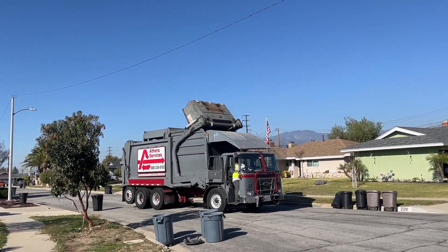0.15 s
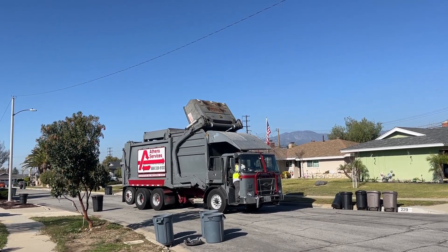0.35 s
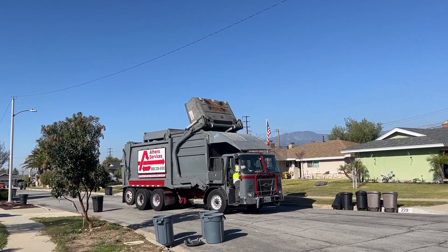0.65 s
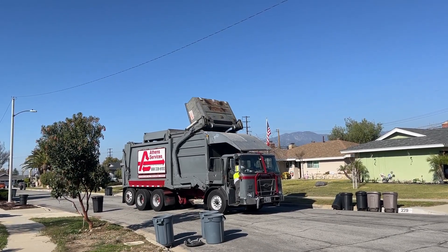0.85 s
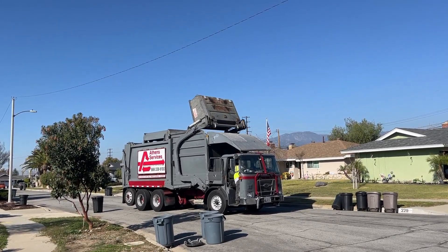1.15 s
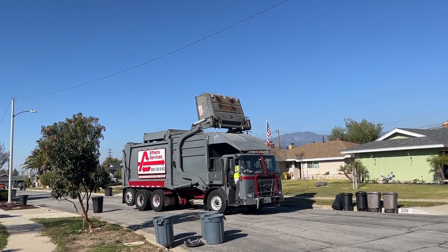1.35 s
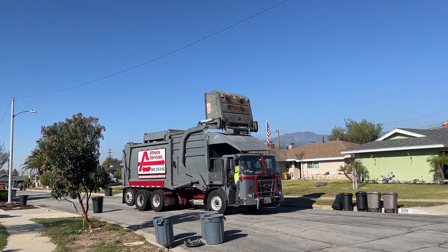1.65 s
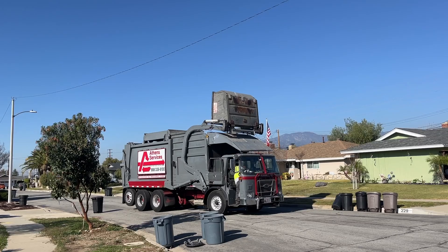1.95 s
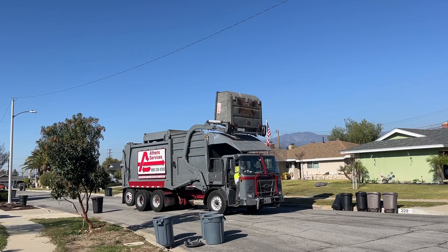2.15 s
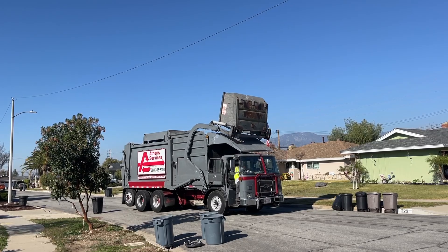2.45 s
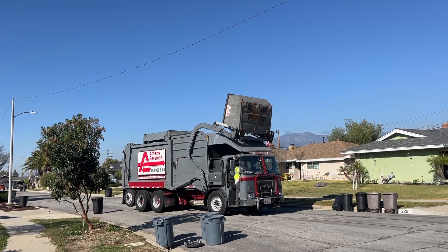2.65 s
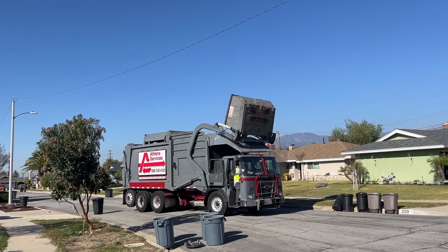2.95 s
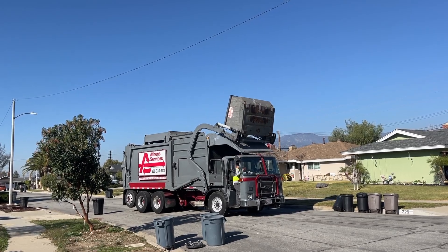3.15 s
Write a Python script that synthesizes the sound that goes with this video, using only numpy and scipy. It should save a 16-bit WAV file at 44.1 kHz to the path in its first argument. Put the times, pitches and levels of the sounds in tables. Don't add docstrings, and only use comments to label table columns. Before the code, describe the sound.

A refuse truck across a residential street throbs and revs, its whine rising then falling with light ticks and hydraulic whistles, until the steel bin slams in a loud, booming clatter. Outdoors, stereo, from across the road.

```python
import sys
import numpy as np
from scipy import signal
from scipy.fft import rfft, irfft
from scipy.io import wavfile
from scipy.ndimage import uniform_filter1d

SR = 44100
rng = np.random.default_rng(int(sys.argv[2]) if len(sys.argv) > 2 else 0)


def amplitude_ratio(level_db):
    exponent = np.asarray(level_db, float) / 20
    return 10 ** exponent


def to_wav(s):
    ch = np.atleast_2d(s).T
    pcm = np.round(np.clip(ch, -1, 1) * 32767)
    wavfile.write(sys.argv[1], SR, pcm.astype(np.int16))


N = 145530


def evened(x):
    return x / np.sqrt(np.mean(x ** 2) + 1e-20)


def read(points, hz):
    f, value = np.transpose(points)
    return np.interp(np.log(hz + 1), np.log(f + 1), value)


def curve(table, column, t):
    table = np.array(table)
    return np.interp(t, table[:, 0], table[:, column])


def phase(hz):
    return 2 * np.pi * np.cumsum(hz) / SR


def wander(top_hz):
    z = rfft(rng.standard_normal(4096))
    slow = irfft(z * np.exp(-(np.arange(len(z)) * SR / N / top_hz) ** 2))
    return evened(np.interp(np.linspace(0, len(slow) - 1, N), np.arange(len(slow)), slow))


def resonate(x, hz, width_hz):
    turn = np.exp(1j * phase(hz * np.ones(len(x))))
    r = np.exp(-np.pi * width_hz / SR)
    return 2 * (turn * signal.lfilter([1 - r], [1, -r], x / turn)).real


def rung_noise(size, hz, width_hz):
    once = resonate(rng.standard_normal(size), hz, width_hz)
    return evened(resonate(once, hz, width_hz))


def shaped(gain_at, size):
    overlap = size * 3 // 4
    hz, t, z = signal.stft(rng.standard_normal(N), SR, nperseg=size, noverlap=overlap)
    z = z * gain_at(hz[:, None], t[None])
    return signal.istft(z, SR, nperseg=size, noverlap=overlap)[1][:N]


def patches(shape, bins, frames):
    blotches = uniform_filter1d(rng.standard_normal(shape), size=bins, axis=0)
    return evened(uniform_filter1d(blotches, size=frames, axis=1))


# time in seconds, pitch in Hz, level in dB.
DRONE = [(0, 79, -22), (.04, 79, -28), (.11, 80, -21), (.15, 82, -20), (.225, 83, -21), (.245, 85, -35),
         (.31, 84, -27), (.37, 75, -27), (.41, 74, -19.5), (.44, 74, -36), (1.11, 88, -36), (1.14, 86, -22),
         (1.21, 88, -29), (1.25, 90, -21), (1.28, 90, -28), (1.51, 82.5, -21), (1.628, 82, -19),
         (1.645, 81, -37), (1.71, 79, -31), (1.82, 80, -24), (1.91, 82, -23), (2.17, 82.5, -20),
         (2.238, 82, -28), (2.252, 81, -19), (2.4, 76.5, -25), (2.5, 76.5, -23), (2.76, 77, -22),
         (3.3, 78, -34)]


def exhaust_drone(t):
    firing = phase(curve(DRONE, 1, t))
    level_db = curve(DRONE, 2, t) + 0.5 * wander(25)
    throb = 1 + 0.18 * np.cos(firing / 4)
    return np.sqrt(2) * amplitude_ratio(level_db) * throb * np.cos(firing)


def pipe_boom():
    return amplitude_ratio(-41) * rung_noise(N, hz=78.6, width_hz=25.6)


# time in seconds, pitch in Hz, level in dB.
WHINE = [(0, 1254, -42), (.17, 1375, -40), (.3, 1450, -47), (.52, 1575, -42), (.64, 1680, -42),
         (.72, 1760, -34), (.8, 1810, -40), (.86, 1850, -39), (.95, 1795, -44), (1.05, 1710, -33),
         (1.1, 1650, -49), (1.16, 1566, -33), (1.22, 1515, -36), (1.26, 1470, -46), (1.33, 1370, -40),
         (1.45, 1285, -39.5), (1.62, 1250, -39.5), (1.9, 1300, -39.5), (2.12, 1350, -42), (2.2, 1295, -42),
         (2.3, 1275, -41), (2.42, 1190, -43), (2.52, 1240, -46), (2.62, 1240, -43), (2.76, 1295, -39),
         (2.9, 1295, -46)]


def shaft_phase(t):
    return phase(curve(WHINE, 1, t) / 48)


# cycles per revolution, level in dB, wander in dB.
SHAFT_ORDERS = [(1.5, -31, 2.5), (2.02, -38, 3), (2.5, -39, 3), (4.6, -41, 2.5), (6.1, -45, 3),
                (9.3, -46, 2), (14, -51, 2.5)]


def shaft_hum(t):
    shaft = shaft_phase(t)
    out = np.zeros(N)
    for order, db, wander_db in SHAFT_ORDERS:
        level = np.sqrt(2) * amplitude_ratio(db + wander_db * wander(8.1))
        out += level * np.sin(order * shaft + .5 * wander(24))
    return out


# frequency in Hz, density in dB per Hz.
ROAR = [(25, -24), (50, -1.5), (200, -5.5), (420, -10), (1300, -15.5), (2900, -24), (5500, -36.5),
        (15000, -63.5)]
# frequency in Hz, gain in dB per doubling of speed.
REVS = [(60, 14), (200, 17.5), (700, 13.5), (1500, 10), (4000, 8.5), (9000, 14.5)]


def engine_roar(t):
    idle_hz, patch_db, swell_db = 1260, 1, 1.14
    swell = wander(3.0)

    def gain_at(hz, s):
        revs_db = read(REVS, hz) * np.log2(curve(WHINE, 1, s) / idle_hz)
        blotch_db = patch_db * patches((hz * s).shape, bins=8, frames=10)
        slow_db = swell_db * np.interp(s * SR, np.arange(N), swell)
        return amplitude_ratio(read(ROAR, hz) + revs_db + blotch_db + slow_db)

    firing = 1 + 0.12 * np.cos(3 * shaft_phase(t))
    return amplitude_ratio(-30.5) * evened(shaped(gain_at, size=1024)) * firing


def gear_whine(t):
    hz = curve(WHINE, 1, t)
    clean = np.sqrt(2) * np.sin(phase(hz + 12 * wander(40.3)))
    blur = rung_noise(N, hz, width_hz=90)
    idling = np.clip((1450 - hz) / 150, 0, 1)
    clean_share = .5 + .22 * (1 - idling)
    pulse = 1 + (.2 + .3 * idling) * np.cos(phase(curve(DRONE, 1, t)) / 4)
    level = amplitude_ratio(curve(WHINE, 2, t) + 2.0 + 2 * wander(22))
    return level * pulse * (clean_share * clean + (1 - clean_share) * blur)


# start in seconds, length in seconds, pitch in Hz, glide in Hz, level in dB.
WHISTLES = [(.68, .47, 870, 30, -40), (2.26, .29, 2385, -70, -46), (0, .17, 1930, 180, -48),
            (2.55, .15, 2390, 60, -47), (1.59, .12, 2410, 40, -48), (1.9, .36, 3200, 60, -56),
            (.74, .2, 4380, 80, -51), (1, .12, 4220, 0, -54), (.81, .22, 3560, -60, -52),
            (.75, .07, 2380, 0, -41), (1.8, .2, 1880, 60, -49), (2.32, .17, 2940, 20, -53),
            (1.3, .25, 3230, -20, -58), (2.47, .2, 3220, 0, -55), (.48, .1, 2400, 0, -49),
            (1.4, .17, 15030, 0, -70), (1.4, .14, 13800, 0, -75), (1.4, .12, 14200, 0, -73)]


def hydraulic_whistles(t):
    out = np.zeros(N)
    for start, length, tone_hz, glide_hz, db in WHISTLES:
        u = np.clip((t - start) / length, 0, 1)
        hz = (tone_hz + glide_hz * (u - .5)) * (1 + .004 * wander(30))
        tone = np.sqrt(2) * amplitude_ratio(2 * wander(15)) * np.sin(phase(hz))
        out += amplitude_ratio(db) * np.sqrt(np.sin(np.pi * u).clip(0)) * tone
    return out


# start in seconds, level in dB, centre in Hz.
KNOCKS = [
    (.1, -57, 8000),
    (.146, -40, 4000),
    (.948, -41, 7000),
    (1.125, -27, 800),
    (1.974, -28, 900),
    (1.54, -42, 2500),
    (2.05, -42, 2500),
    (2.35, -41, 1800),
    (2.625, -43, 4500),
    (.778, -40, 2000),
]


def linkage_knocks(t):
    out = np.zeros(N)
    t60_s = .06
    for start, db, hz in KNOCKS:
        tick = rung_noise(SR // 8, hz, 0.83 * hz)
        out[round(start * SR):][:len(tick)] += tick * amplitude_ratio(db - 60 * t[:len(tick)] / t60_s)
    return out


# peak in seconds, width in seconds, level in dB.
PUFFS = [
    (0.702, 0.082, -46),
    (1.4, 0.081, -61),
    (0.3, 0.055, -58),
]


def air_puffs(t):
    def gain_at(hz, s):
        ratio = hz / 4900
        return ratio ** 2 / (1 + ratio ** 5.1) + 0 * s

    swell = sum(amplitude_ratio(db) * np.exp(-((t - peak) / width) ** 2) for peak, width, db in PUFFS)
    return evened(shaped(gain_at, size=256)) * swell


# start in seconds, level in dB, brightness in dB, boom in dB, sheen in dB per octave.
SLAMS = [(2.758, -24.5, 3.5, -7, 15), (2.78, -11.5, 8, 4, 24.5), (2.799, -22, -4, 2, 24),
         (2.837, -15.5, -6.5, 2, 10), (2.865, -20.5, 4.5, -1.5, 12), (2.884, -11.5, 0.5, -1, -5),
         (2.944, -14.5, 1, 1, 5), (2.988, -15, -6.5, 0.5, 9), (3.031, -23.5, -8, -3.5, 0),
         (3.085, -16, 3, 0.5, 24), (3.095, -11.5, -1.5, -15, 23.5), (3.14, -15, -5, -10, 17),
         (3.166, -18.5, -11, -13.5, 9), (3.206, -20.5, -13.5, -26.5, 5)]
# frequency in Hz, density in dB per Hz.
CRASH = [(30, -24), (80, 1), (190, -7.5), (400, -4.5), (570, -12.5), (1050, -11), (4000, -19.5),
         (7500, -31)]
# frequency in Hz, t60 in seconds.
CRASH_T60 = [(60, 1.8), (400, 1.92), (1200, 0.48), (2500, 0.15), (7000, 0.15), (12000, 0.052)]
# frequency in Hz, rise in seconds.
CRASH_RISE = [(60, 0.0047), (400, 0.0066), (2000, 0.001), (8000, 0.0006)]


def bin_crash(t):
    def sheen_octaves(hz):
        return np.log2(np.maximum(hz / 8000, 1))

    def gain_at(hz, s):
        power = 0
        bright = hz / (hz + 2500)
        low = np.clip(1 - hz / 300, 0, 1)
        for at, db, bright_db, boom_db, sheen_db in SLAMS:
            since = np.maximum(s - at, 0)
            rise = np.minimum(since / read(CRASH_RISE, hz), 1)
            body_db = db * (1 - low) + (boom_db - 14) * low
            color_db = bright_db * bright + sheen_db * sheen_octaves(hz)
            fade_db = -60 * since / read(CRASH_T60, hz)
            power = power + (rise * amplitude_ratio(body_db + color_db + fade_db)) ** 2
        rattle_db = 0.5 * bright * patches(power.shape, bins=10, frames=5)
        return np.sqrt(power) * amplitude_ratio(19 + rattle_db)

    hz = np.fft.rfftfreq(N, 1 / SR)
    spectrum_db = read(CRASH, hz) - 75 * sheen_octaves(hz)
    crash = irfft(rfft(shaped(gain_at, size=256)) * amplitude_ratio(spectrum_db), N)
    return crash * (t > SLAMS[0][0])


# pitch in Hz, level in dB, t60 in seconds.
PANELS = [(61.6, 2.5, 1), (101.6, 6.5, 1), (238, -4, 1), (307.2, -6, 0.74), (389.6, -7, 1),
          (418.5, -5, 0.54), (449, -9.5, 0.64), (729.6, -9.5, 0.68), (863, -8, 0.14), (961, -4, 0.46),
          (1080, -4.5, 0.95), (1500, -24.5, 0.13), (2000, -12, 0.053), (3580, -23, 0.19)]


def panel_ring(t):
    spread_db, shudder_t60_s = 3, 0.15
    out = np.zeros(N)
    first = round(SLAMS[0][0] * SR)
    after = t[first:]
    for hz, mode_db, t60 in PANELS:
        shudder = np.zeros(N - first)
        for at, db, _, boom_db, _ in SLAMS:
            strike_db = boom_db - 17 if hz < 150 else db
            strike_db += spread_db * rng.standard_normal() * min(hz / 500, 1)
            shudder += (after > at) * amplitude_ratio(strike_db - 60 * abs(after - at) / shudder_t60_s)
        drift_hz = hz * (1 + .008 * wander(12)[first:])
        ring = resonate(shudder * rng.standard_normal(N - first), drift_hz, 3.5 / t60)
        out[first:] += amplitude_ratio(mode_db - 24) * evened(ring)
    return out


# start in seconds, pitch in Hz, level in dB, t60 in seconds.
CLANKS = [(2.758, 5350, -40, .05), (2.78, 3980, -25, .06), (2.782, 2150, -19, 0.11), (2.782, 950, -15, .14),
          (2.84, 916, -16.5, 0.14), (2.888, 4800, -23, 0.066), (2.887, 3550, -18, 0.11),
          (2.888, 2040, -19, 0.088), (2.888, 695, -18, 0.074), (2.948, 1950, -19.5, 0.089),
          (2.955, 1070, -21, 0.64), (3.034, 52.2, -22, 0.16), (3.092, 2034, -19.5, .12),
          (3.097, 1813, -22, 0.18), (3.136, 1465, -18.5, 0.12), (3.142, 838, -13.5, 0.21),
          (3.149, 55.4, -14, .3), (3.164, 1596, -35, .1), (3.2, 787, -13, 0.089),
          (3.205, 397.8, -16.5, 0.7), (3.236, 489, -23.5, 0.14), (3.278, 294, -19.5, 0.18)]


def clanks():
    out = np.zeros(N + SR)
    u = np.arange(SR // 3) / SR
    for start, hz, db, t60 in CLANKS:
        upper = np.sin(2 * np.pi * hz * 1.03 * u + 2 * np.pi * rng.random())
        pair = np.sin(2 * np.pi * hz * u) + 0.85 * upper
        rattle = evened(resonate(rng.standard_normal(len(u)), hz, 0.027 * hz))
        rise = np.minimum(u / (0.0021 + 1 / hz), 1)
        out[round(start * SR):][:len(u)] += rise * amplitude_ratio(db - 60 * u / t60) * (pair + 0.2 * rattle)
    return out[:N]


def street(x):
    t60_s = .2
    at = np.arange(0, 6000, 20) + rng.integers(0, 20, size=300)
    taps = np.zeros(at[-1] + 1)
    taps[at] = rng.choice([-1., 1.], len(at)) * amplitude_ratio(-60 * at / SR / t60_s)
    return signal.fftconvolve(x, taps / np.linalg.norm(taps))[:N]


# frequency in Hz, left over right in dB.
SHADE = [(300, 0), (500, 2), (800, 7), (1300, 8), (1900, 4), (2800, -1.5), (4600, -6), (5600, 0)]
# frequency in Hz, lead of the left port in radians.
LEAD = [(1500, 0), (2100, .4), (2650, 1.9), (3300, 2.1), (4300, 1.8), (4700, 2.3), (5100, 1.1), (5650, 2.4)]
# frequency in Hz, share of the sound common to both.
ALIKE = [(250, .9995), (520, .72), (850, .52), (1800, .8), (2500, .55), (3600, .82), (4800, .45),
         (5600, .55)]


def two_ports(x):
    hz = np.fft.rfftfreq(N, 1 / SR)
    alike = np.clip(read(ALIKE, hz), 0, 1)
    shade = amplitude_ratio(read(SHADE, hz) / 2)
    direct = rfft(x)
    right = direct * alike * np.exp(-1j * read(LEAD, hz)) + rfft(street(x)) * np.sqrt(1 - alike ** 2)
    return np.array([irfft(direct * shade, N), irfft(right / shade, N)])


def scene():
    t = np.arange(N) / SR
    engine = exhaust_drone(t) + pipe_boom() + shaft_hum(t) + engine_roar(t)
    lift = gear_whine(t) + hydraulic_whistles(t) + linkage_knocks(t) + air_puffs(t)
    steel = bin_crash(t) + panel_ring(t) + clanks()
    return two_ports(engine + lift + steel)


def band_limit(x):
    return signal.sosfilt(signal.butter(12, 15400, fs=SR, output="sos"), x)


FLIPS_HZ = [5750, 6700, 9400, 11200, 13850]


def record(dry):
    excess = 0.95 * dry - np.tanh(dry / 0.91) * 0.87
    below_5k = signal.butter(4, 5000, fs=SR, output="sos")
    limited = 0.98 * dry - signal.sosfiltfilt(below_5k, excess)
    held = signal.lfilter(*signal.butter(2, 50.5, "high", fs=SR), limited)
    hz, t, z = signal.stft(held, SR, nperseg=512)
    drift = 1 + .015 * np.interp(t * SR, np.arange(N), wander(25))
    band = np.searchsorted(FLIPS_HZ, hz[:, None] * drift)
    z[1] = np.where(band > 0, z[0] * (-1.) ** band, z[1])
    mix = signal.istft(z, SR, nperseg=512)[1][:, :N]
    return band_limit(mix)


dry = scene()
out = record(dry)
to_wav(out)
```